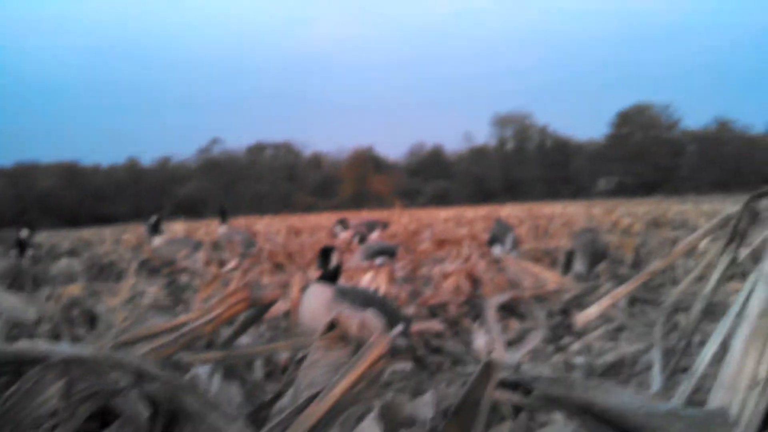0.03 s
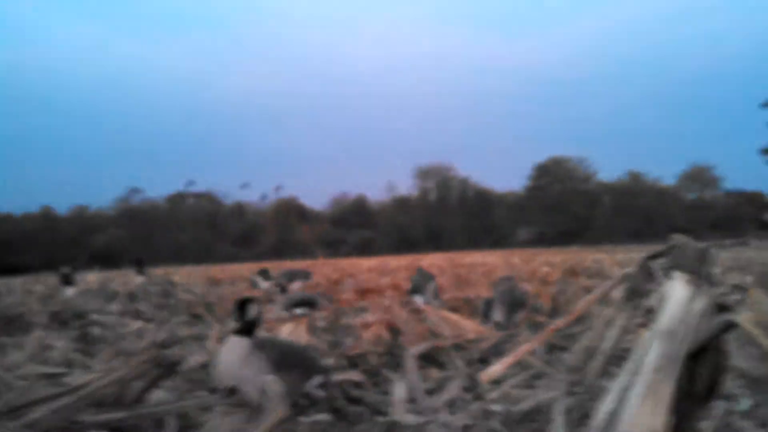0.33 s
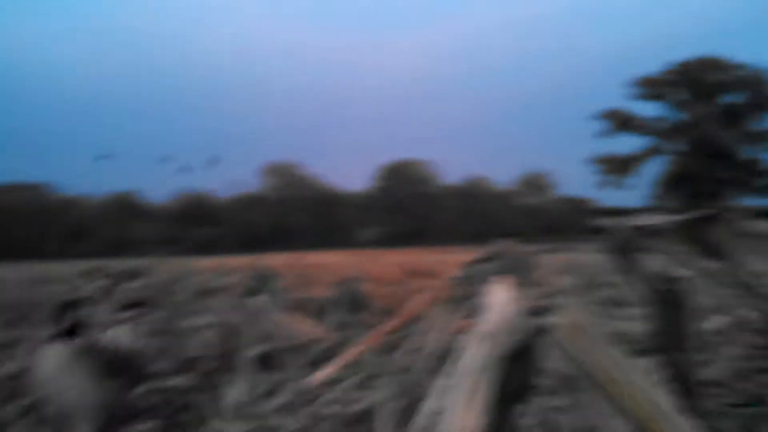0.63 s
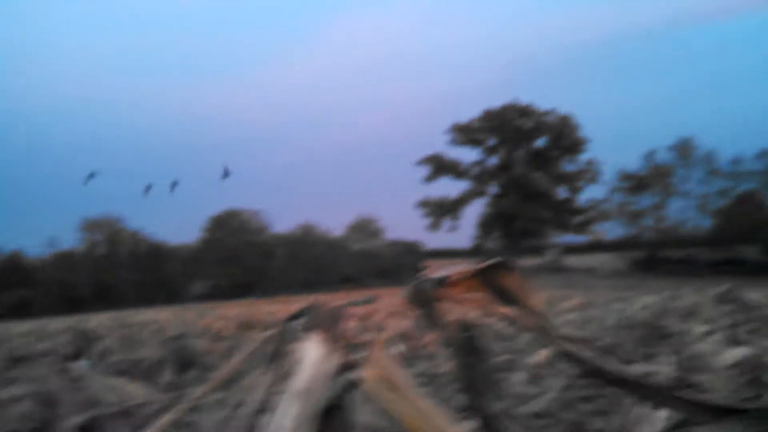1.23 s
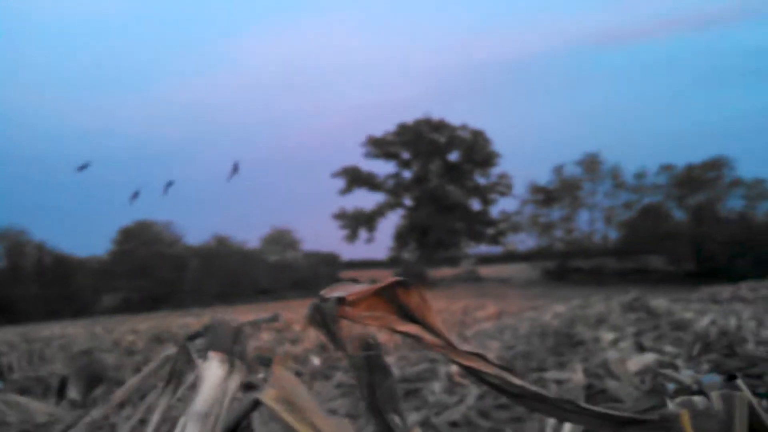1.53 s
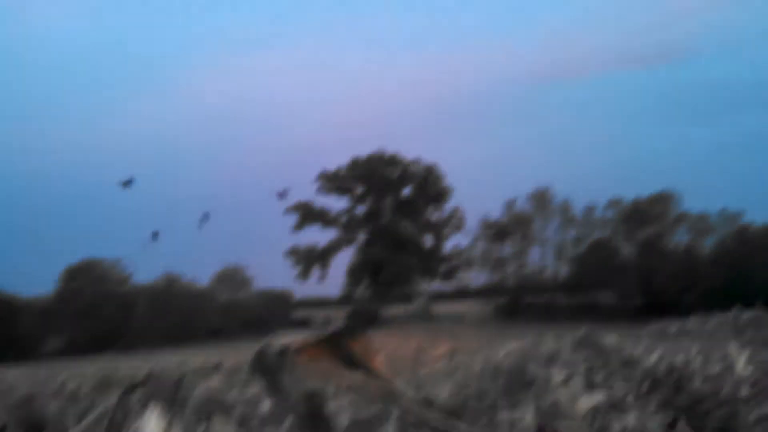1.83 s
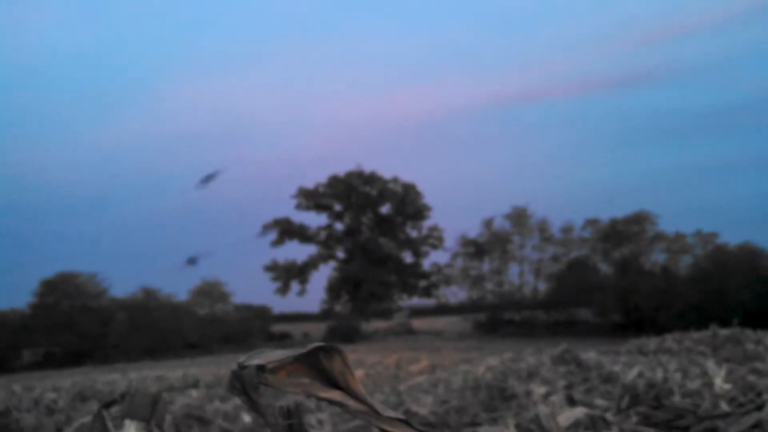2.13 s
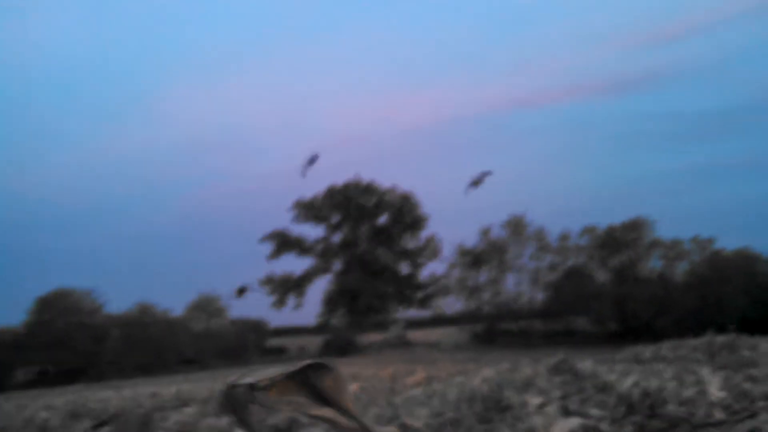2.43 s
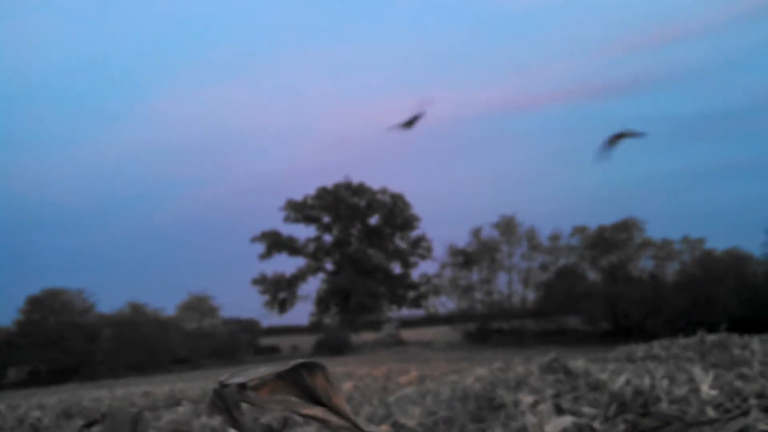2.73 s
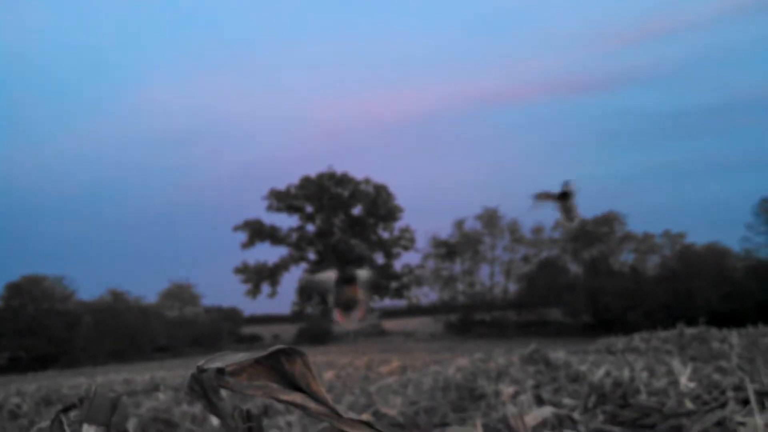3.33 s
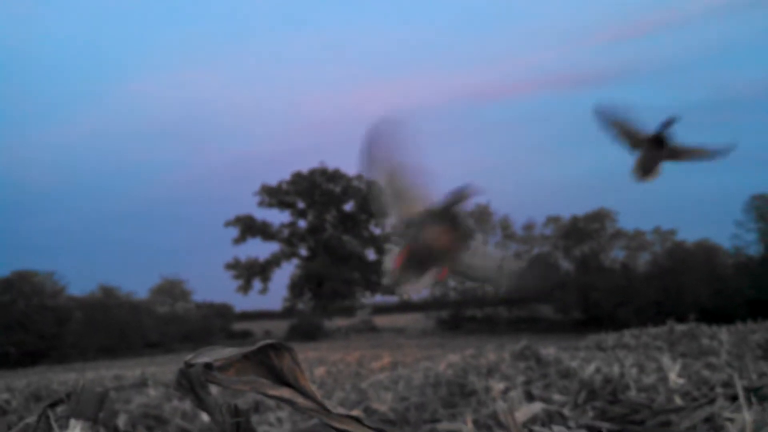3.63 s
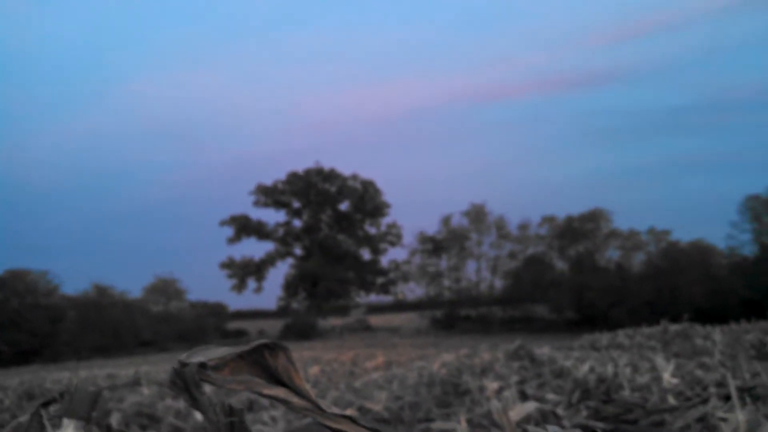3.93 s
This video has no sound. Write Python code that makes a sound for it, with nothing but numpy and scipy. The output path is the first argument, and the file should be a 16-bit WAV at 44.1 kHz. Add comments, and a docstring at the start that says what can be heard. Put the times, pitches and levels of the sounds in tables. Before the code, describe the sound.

Duck wings rush and beat close overhead at the end of a quiet stretch in an open field. First come a low faraway roar, a hum and small rustles and ticks near the microphone, then the wingbeats swell quickly.

```python
"""A low distant roar, a hum and a faint trill lie over a stubble field at dusk.
Dry stalks tick and clothing rustles close to a hand-held camera.
Then ducks fly in low and pass just overhead: air rushes through their feathers,
each wingbeat swishes and whistles, and the nearest ones buffet the microphones."""
import sys
import numpy as np
from scipy import signal
from scipy.fft import rfft, irfft
from scipy.io import wavfile

SR = 44100
rng = np.random.default_rng(int(sys.argv[2]) if len(sys.argv) > 2 else 0)


def digitize_waveform(pressure):
    """Quantize a signal to 16-bit integers and store it at the path in sys.argv[1].

    Rows of a 2-D input are taken as channels; values are limited to [-1, 1].
    """
    field = np.atleast_2d(pressure).T
    bounded = np.clip(field, -1, 1)
    quanta = np.round(bounded * 32767).astype(np.int16)
    wavfile.write(sys.argv[1], SR, quanta)


N = 176400
T, HZ = np.arange(N) / SR, np.fft.rfftfreq(N, 1 / SR)


def amp(db):
    """Decibels to gain."""
    return 10 ** (np.asarray(db) / 20)


def per_bin(points):
    """Table interpolated over log frequency."""
    hz, value = np.transpose(points)
    return np.interp(np.log(HZ + 1), np.log(hz), value)


def envelope(points):
    """Table of dB over time, as gain."""
    return amp(np.interp(T, *np.transpose(points)))


def lowpass(x, cutoff_hz):
    """Zero-phase low-pass, 24 dB/octave."""
    return irfft(rfft(x) / (1 + (HZ / cutoff_hz) ** 4), N)


def wander(rate_hz):
    """Smooth noise, rms 1."""
    x = lowpass(rng.standard_normal(N), rate_hz)
    return x / x.std()


def flutter(depth_db, rate_hz):
    """Random gain, mean power 1."""
    gain = amp(depth_db * wander(rate_hz))
    return gain / np.sqrt(np.mean(gain ** 2))


def bell(at_s, sigma_s):
    """Gaussian envelope, peak 1."""
    return np.exp(-.5 * ((T - at_s) / sigma_s) ** 2)


def stereo_noise(spectrum, coherence, balance, lag_s):
    """Coloured noise from one direction; balance is left minus right, and the left lags."""
    right, independent = rfft(rng.standard_normal((2, N)))
    alike = np.clip(per_bin(coherence), 0, .999)
    tilt = amp(per_bin(balance))
    left = alike * right + np.sqrt(1 - alike ** 2) * independent
    left = left * tilt * np.exp(-2j * np.pi * HZ * lag_s)
    colour = amp(per_bin(spectrum)) * np.sqrt(SR / (1 + tilt ** 2))
    return irfft(np.array([left, right]) * colour, N)


# Wing noise spectra: f/Hz, density/dB
RUSH_SPECTRUM = [(100, -54.5), (250, -72), (550, -75.5), (950, -76.5), (1400, -84.5), (1900, -83.5),
                 (2600, -88), (4400, -89.5), (5500, -91.5), (7500, -89.5), (10500, -96), (14500, -92.5)]
SWISH_SPECTRUM = [(300, -61), (800, -74.5), (1400, -79), (1950, -66.5), (2600, -80.5), (4300, -80.5),
                  (5400, -81), (6800, -80.5), (8500, -81.5), (11000, -101), (15000, -90)]
PUSH_SPECTRUM = [(60, -67), (150, -57.5), (260, -68), (400, -66.5), (620, -71), (900, -89), (1500, -87.5),
                 (4000, -100)]
FLAP_SPECTRUM = [(100, -84), (300, -63.5), (600, -55.5), (850, -69), (1300, -83), (3000, -76), (9000, -100)]
GUST_SPECTRUM = [(20, -85), (38, -60), (54, -27), (80, -42), (130, -57), (300, -92), (1000, -115)]
# Microphone likeness, close sources and gusts: f/Hz, coherence/0-1
NEAR_COHERENCE = [(50, 0.99), (300, 0.99), (600, 1), (1500, 0.84), (3000, 0.39), (8000, 0.087),
                  (13000, 0.22)]
GUST_COHERENCE = [(50, .985), (200, .985)]
# Left minus right: f/Hz, level/dB
DUCK_BALANCE = [(100, 0), (1000, -1.5), (2000, 37), (3200, 21), (6500, 58), (9000, -2), (12000, 8),
                (15000, -2)]
# Rush of the nearing flock: t/s, level/dB
APPROACH = [(0, -45), (2.4, -43), (2.9, -15), (3.16, -15), (3.3, -6), (3.42, -4), (3.52, -2.5), (3.6, -1.5),
            (3.72, 2.5), (3.8, 4.5), (3.9, 5.5), (4, 2.5)]
# Wingbeats: t/s, swish level/dB, push level/dB
WINGBEATS = [(3.199, -19, -28), (3.3, -26, -25), (3.455, -22, -4.5), (3.586, -9, -0.5), (3.697, -3, 4.5),
             (3.786, 1.5, -1), (3.866, -7.5, -6), (3.887, -1.5, 8), (3.968, -4, 2)]
# Closest feather flaps, gusts on the microphones: t/s, level/dB
FLAPS = [(3.585, -14), (3.648, -10), (3.674, -5), (3.724, -3), (3.812, 2), (3.836, -5), (3.871, -2),
         (3.919, 1)]
GUSTS = [(3.713, -1), (3.8, 4), (3.897, 2.5), (3.932, -3)]


def wings(push_delay_s=.029, lag_s=.0001, treble_exponent=1.18):
    """Air rushes through feathers; beats swish, then push air; the nearest flap and buffet."""
    spectra = RUSH_SPECTRUM, SWISH_SPECTRUM, PUSH_SPECTRUM, FLAP_SPECTRUM
    rush, swish, push, flap = (stereo_noise(s, NEAR_COHERENCE, DUCK_BALANCE, lag_s) for s in spectra)
    gust = stereo_noise(GUST_SPECTRUM, GUST_COHERENCE, DUCK_BALANCE, lag_s)
    nearness = envelope(APPROACH)
    body = lowpass(rush, cutoff_hz=2000)
    treble = rush - body
    body *= nearness * flutter(depth_db=2, rate_hz=38)
    treble *= nearness ** treble_exponent * flutter(depth_db=1.5, rate_hz=24)
    swish *= sum(amp(db) * bell(t, sigma_s=.014) for t, db, _ in WINGBEATS)
    push *= sum(amp(db) * bell(t + push_delay_s, sigma_s=.019) for t, _, db in WINGBEATS)
    beats = (swish + push) * flutter(depth_db=2, rate_hz=160)
    flap *= sum(amp(db) * bell(t, sigma_s=.003) for t, db in FLAPS)
    gust *= sum(amp(db) * bell(t, sigma_s=.012) for t, db in GUSTS)
    return body + treble + beats + flap + gust


# Feather notes: t/s, sigma/s, f/Hz, glide/(Hz/s), level/dB, rasp/0-1
WHISTLES = [(2.93, .007, 4910, -3000, -64, .8), (2.978, 0.0046, 4060, 1999, -59.5, .3),
            (3.19, .006, 4500, 2000.5, -59, .4), (3.295, 0.0077, 6930, -8000, -63, 0.8),
            (3.316, 0.01, 4560, 9002, -54, 0.56), (3.352, .007, 7000, 0.5, -66, .9),
            (3.44, 0.0094, 4510, -3000, -51.5, 0.7), (3.465, .0042, 6050, -22000, -40.5, .2),
            (3.574, 0.013, 4430, -4000, -53, 0.74), (3.696, 0.007, 4530, 1, -48, .6),
            (3.78, 0.0059, 6600, 12002.5, -37.5, 0.7), (3.806, 0.0095, 4600, 1, -46, 0.3),
            (3.874, .005, 7760, 2, -40, .4), (3.89, 0.0087, 4440, 5000.5, -48, 0.3),
            (3.964, 0.01, 7400, -8000, -40.5, 0.8), (3.995, 0.01, 4500, 9005, -47, .5)]


def feather_whistles(wobble_rms_hz=69.7, right_db=-31):
    """Feather tips sing a brief unsteady note on a stroke, some clear, some raspy."""
    out = np.zeros(N)
    wobble_hz = wobble_rms_hz * wander(rate_hz=630)
    roughness = wander(rate_hz=328) + 1j * wander(rate_hz=328)
    for t, sigma_s, hz, glide, db, rasp in WHISTLES:
        cycles = np.cumsum(hz + glide * (T - t) + wobble_hz) / SR
        note = (1 + rasp * roughness) * np.exp(2j * np.pi * cycles)
        out += amp(db) * bell(t, sigma_s) * np.sqrt(2) * note.real
    return np.array([out, amp(right_db) * out])


# Clothing and stalk spectra: f/Hz, density/dB
RUSTLE_SPECTRUM = [(800, -110), (2000, -101), (4000, -99), (6500, -103), (10000, -102), (12500, -94.5),
                   (15000, -94)]
KNOCK_SPECTRUM = [(100, -79), (320, -67), (600, -76.5), (1200, -76), (1800, -86), (2400, -76.5),
                  (3500, -80), (4600, -84.5), (7000, -92), (15000, -100)]
SNAP_SPECTRUM = [(1000, -118), (3000, -106), (4500, -98), (6500, -94.5), (10000, -93.5), (13000, -87),
                 (15500, -86)]
# Left minus right: f/Hz, level/dB
HAND_BALANCE = [(100, 14), (4000, -2.5), (9000, -26), (13000, -16)]
# Clothing rub: t/s, level/dB
RUBBING = [(0, -25), (.42, -16), (.52, -6), (.78, -2), (.95, -5), (1.12, -20), (1.3, -1.5), (1.5, -4.5),
           (1.64, 0.5), (1.72, -12), (1.82, -39), (1.98, -7), (2.25, -44), (2.45, -12), (2.7, -43),
           (4, -21)]
# Stalk and handling ticks: t/s, length/s, knock level/dB, snap level/dB
TICKS = [(0.6315, .004, -2.5, 4), (0.648, .001, -12, -14), (0.807, .002, -22, 3), (1.177, .002, -14, -12),
         (1.2943, .002, -7, -1), (1.296, .003, 3, 4.5), (1.387, .002, -20, -2), (1.3952, .0015, -13, 4),
         (1.4145, .001, -3, 13), (1.888, .001, -10, -18), (1.951, .003, -13, -11), (1.963, .005, -13, -9),
         (2.014, .0015, -14, -5), (2.127, .003, -14, -7), (2.148, .002, -7.5, -4), (2.357, .001, -12, -18),
         (2.4905, .002, -3, -5), (2.5045, .002, -4, -22)]
# Ring of a struck stalk: f/Hz, level/dB, decay/s
STALK_MODES = [(560, -54, .005), (1230, -58, .004), (2550, -64, .003)]


def clothing_and_stalks(rise_s=.00015, knock_release_s=.002, snap_release_s=.0006):
    """Clothing rubs with a grainy rustle; dry stalks crunch, stop short and ring briefly."""
    rustle, knock, snap = (stereo_noise(s, NEAR_COHERENCE, HAND_BALANCE, lag_s=.00005)
                           for s in (RUSTLE_SPECTRUM, KNOCK_SPECTRUM, SNAP_SPECTRUM))
    out = rustle * envelope(RUBBING) * flutter(depth_db=3.5, rate_hz=420)
    for t, length_s, knock_db, snap_db in TICKS:
        age_s = np.clip(T - t, 0, .2)
        tail_s = np.maximum(age_s - length_s, 0)
        attack = 1 - np.exp(-age_s / rise_s)
        ring = sum(amp(db) * np.exp(-age_s / decay_s) * np.sin(2 * np.pi * hz * age_s)
                   for hz, db, decay_s in STALK_MODES)
        out += amp(knock_db) * (attack * np.exp(-tail_s / knock_release_s) * knock + ring)
        out += amp(snap_db) * attack * np.exp(-tail_s / snap_release_s) * snap
    return out


# Roar spectrum: f/Hz, density/dB
ROAR_SPECTRUM = [(20, -81), (36, -83), (52, -55), (85, -62.5), (115, -61.5), (190, -68.5), (290, -75.5),
                 (370, -79.5), (510, -86.5), (760, -81.5), (1000, -81), (1400, -91.5), (2100, -97),
                 (3300, -100), (6000, -106), (10300, -110), (14500, -105)]
# Microphone likeness: f/Hz, coherence/0-1
ROAR_COHERENCE = [(50, 0.88), (160, 0.99), (500, 0.69), (1100, 0.7), (2000, 0.2), (4000, 0)]
# Left minus right: f/Hz, level/dB
ROAR_BALANCE = [(100, -.3), (2000, 0), (9000, -.5), (13000, -4)]
# Upper band of the roar: t/s, level/dB
ROAR_SWELL = [(0, -1.5), (.6, -2.5), (1.2, -0.1), (2.4, -0.5), (4, 0)]
FAR_LAG_S = .00027


def distant_roar():
    """Low wavering noise whose upper band swells a little."""
    roar = stereo_noise(ROAR_SPECTRUM, ROAR_COHERENCE, ROAR_BALANCE, FAR_LAG_S)
    roar *= flutter(depth_db=1.19, rate_hz=3.3)
    low = lowpass(roar, cutoff_hz=400)
    return low + (roar - low) * envelope(ROAR_SWELL)


# Hum envelope: t/s, level/dB
HUM_LEVEL = [(0, -45), (.7, -43), (1.7, -46), (2.1, -47), (2.5, -45), (2.8, -49.5), (4, -55)]


def distant_hum(pitch_hz=157, drift_rms_hz=2.1):
    """One low tone, unsteady in pitch and level."""
    drift_cycles = np.cumsum(drift_rms_hz * wander(rate_hz=7.4)) / SR
    cycles = pitch_hz * np.array([T - FAR_LAG_S, T]) + drift_cycles
    tone = np.sqrt(2) * np.sin(2 * np.pi * cycles)
    return tone * envelope(HUM_LEVEL) * flutter(depth_db=2.5, rate_hz=7.4)


# Faint trills: start/s, end/s, level/dB
TRILLS = [(0.087, 0.52, -74.5), (2.473, 2.822, -79)]


def distant_trills(pitch_hz=3690, arch_hz=130, rate_hz=32.1, fade_s=.025):
    """Trains of even chirps, each a small arch of pitch."""
    out = np.zeros(N)
    for start_s, end_s, db in TRILLS:
        arch = np.sin(np.pi * rate_hz * (T - start_s)) ** 2
        gate = np.clip(np.minimum(T - start_s, end_s - T) / fade_s, 0, 1)
        cycles = np.cumsum(pitch_hz + arch_hz * arch) / SR
        out += amp(db) * gate * 2 * arch ** 2 * np.sin(2 * np.pi * cycles)
    return out


def scene():
    """Sum at the two microphones."""
    background = distant_roar() + distant_hum() + distant_trills()
    return background + wings() + feather_whistles() + clothing_and_stalks()


def record(dry):
    """The camera widens the stereo by subtracting the delayed opposite channel, then band-limits."""
    crossfeed, delay_samples, right_db, cutoff_hz = .99, 16, 1.2, 15600
    opposite = np.pad(dry[::-1], ((0, 0), (delay_samples, 0)))[:, :N]
    wide = (dry - crossfeed * opposite) * np.array([[1], [amp(right_db)]])
    taps = signal.firwin(511, cutoff_hz, window=("kaiser", 9), fs=SR)
    return signal.oaconvolve(wide, taps[None], "same")


dry = scene()
out = record(dry)
digitize_waveform(out)
```